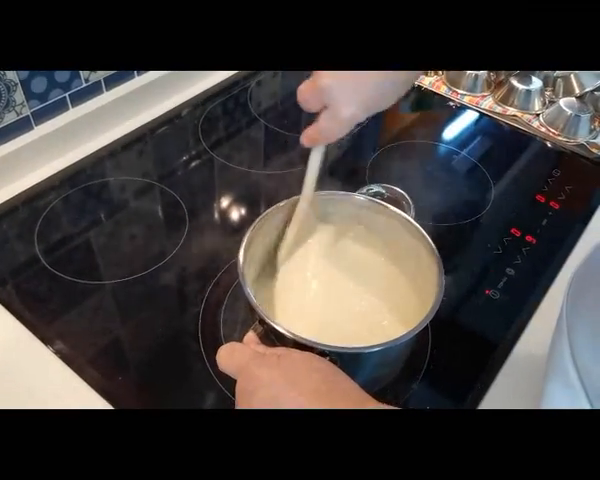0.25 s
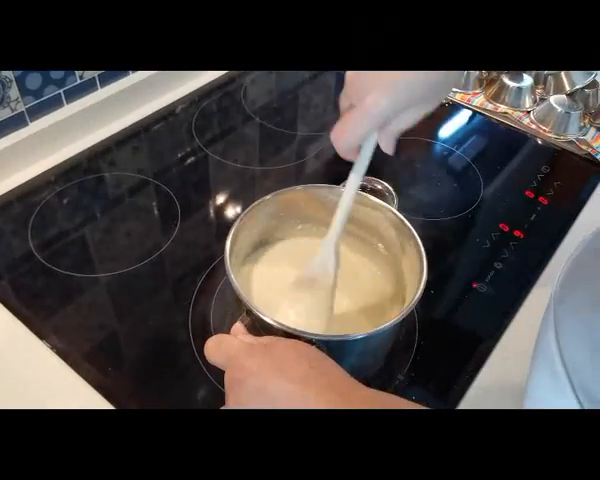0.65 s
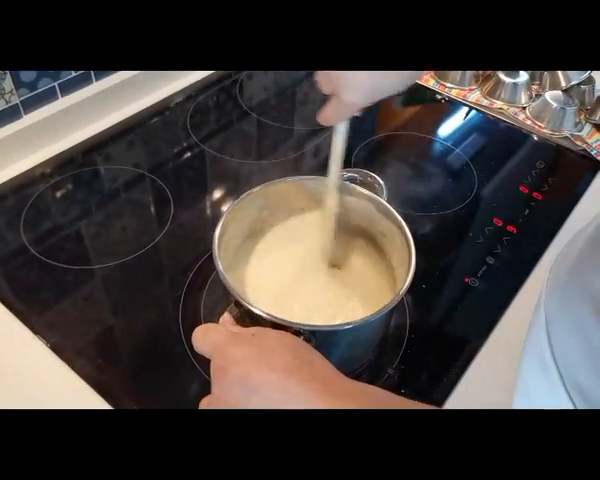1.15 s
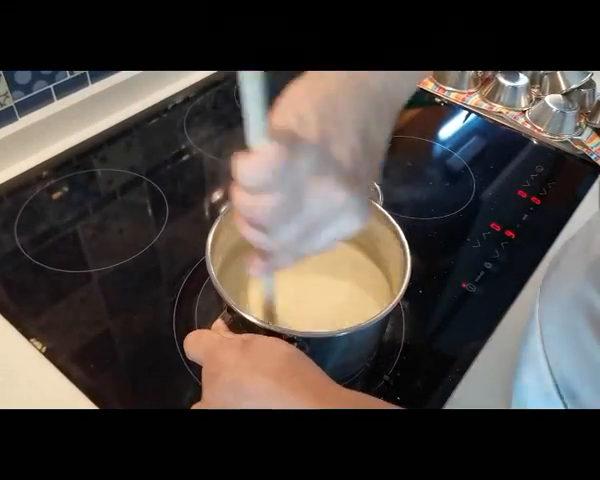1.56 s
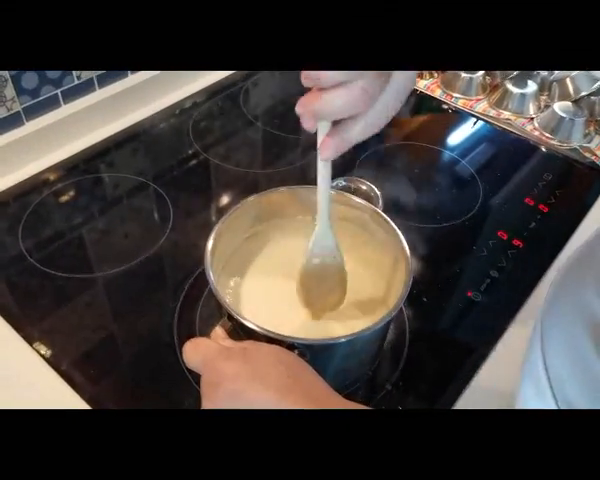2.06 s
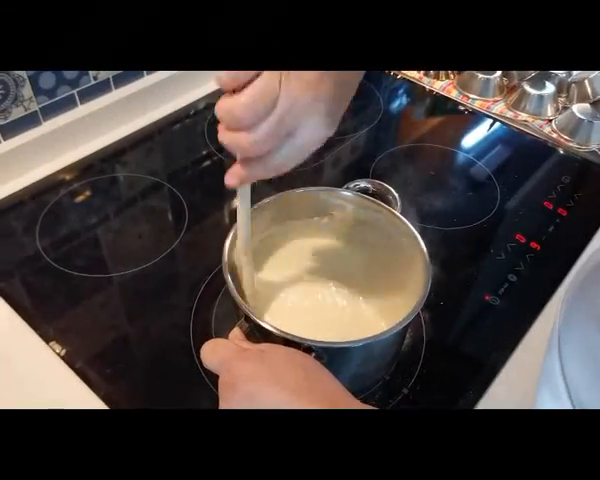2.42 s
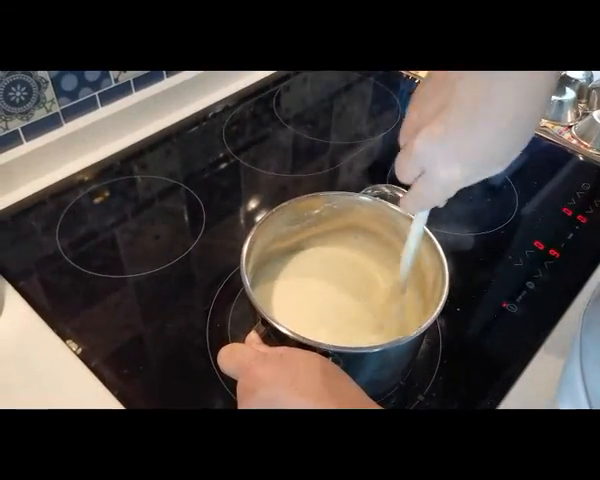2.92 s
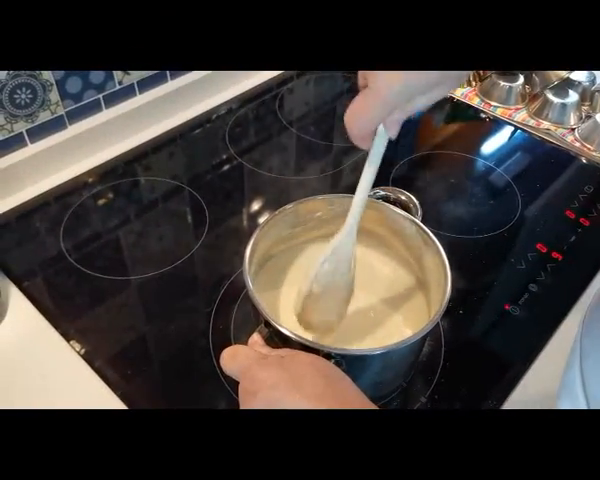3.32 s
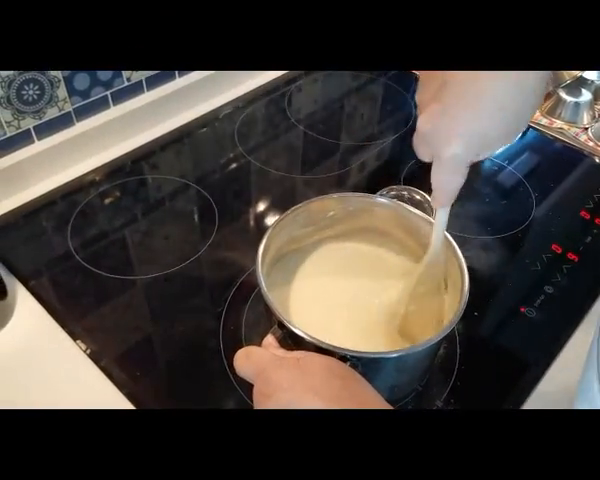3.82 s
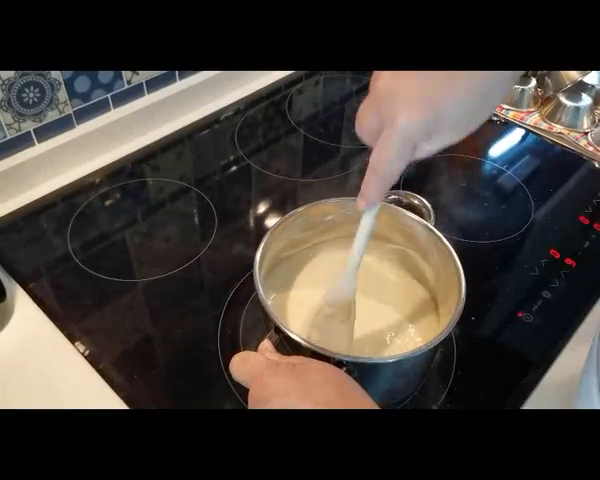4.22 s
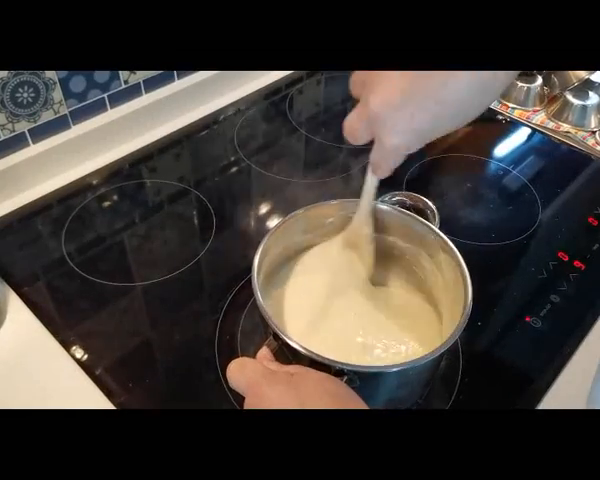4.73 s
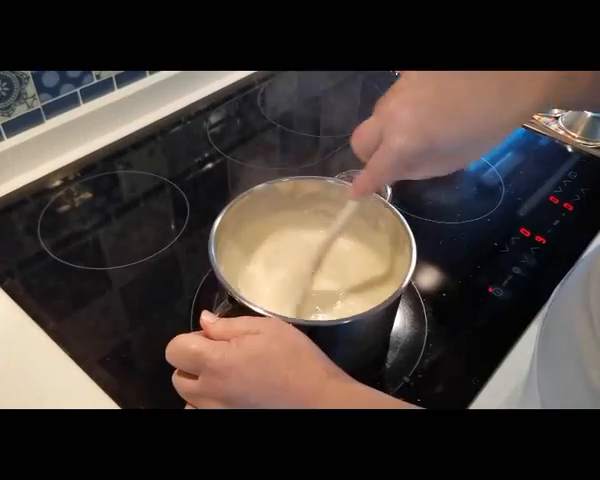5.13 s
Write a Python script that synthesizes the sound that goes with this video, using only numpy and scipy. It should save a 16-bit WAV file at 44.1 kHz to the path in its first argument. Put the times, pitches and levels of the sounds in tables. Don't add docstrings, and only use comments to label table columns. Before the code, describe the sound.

Irregular muffled wood-on-steel knocks break up soft scraping and wet dragging as a heavy filling is stirred in a pan on a glass hob.

```python
import sys
import numpy as np
from scipy import signal
from scipy.fft import rfft, irfft, next_fast_len
from scipy.io import wavfile
from scipy.ndimage import uniform_filter1d, map_coordinates

SR = 44100
rng = np.random.default_rng(int(sys.argv[2]) if len(sys.argv) > 2 else 0)


def voltage_ratio(decibels):
    exponent = np.asarray(decibels, float) / 20
    return 10 ** exponent


def persist_wave(psi):
    counts = np.round(np.clip(psi, -1, 1) * 32767).astype(np.int16)
    wavfile.write(sys.argv[1], SR, np.atleast_2d(counts).T)


N = 237037

# (frequency [Hz], left-right likeness [0-1])
ALIKE = [(60, .88), (300, .82), (700, .5), (1400, .3), (2800, .14), (6000, .04), (12000, .16)]
# (frequency [Hz], width [Hz], level [dB])
BOTTOM = [(915, 110, -2.5), (1450, 190, 0), (1800, 200, -5), (2160, 140, .5), (2600, 200, -3),
          (2900, 350, -4.5)]
# (frequency [Hz], width [Hz], level [dB])
WALL = [(2580, 120, -5), (2890, 91, 4), (3330, 140, -7.5), (3890, 350, 0.5), (4540, 450, 6), (5130, 430, 6),
        (6410, 1600, -1)]


def unit(x):
    return x / np.sqrt(np.mean(x ** 2) + 1e-20)


def along(points, hz):
    f, v = np.transpose(points)
    return np.interp(np.log(hz + 1), np.log(f + 1), v)


def curves(rows):
    s, *columns = np.transpose(rows)
    return [np.interp(np.arange(N) / SR, s, c) for c in columns]


def wobble(rate):
    knots = rng.standard_normal(int(N * rate / SR) + 4)
    return map_coordinates(knots, [np.arange(N) * rate / SR], order=1)


def filtered(x, response):
    m = next_fast_len(N + SR // 2)
    return irfft(rfft(x, m) * response(np.fft.rfftfreq(m, 1 / SR)), m)[..., :N]


def resonances(modes):
    def response(f):
        total = 0
        for k, (centre, width, db) in enumerate(modes):
            damping = 1j * f * width
            total = total + (-1) ** k * voltage_ratio(db) * damping / (centre * centre - f * f + damping)
        return total
    return response


def spread(hz):
    return np.arccos(along(ALIKE, hz))


def pair(response, grit_db=0., rate=300, patchy_db=1.5):
    rough = rng.standard_normal((2, N)) * voltage_ratio(grit_db * wobble(rate))
    z = signal.stft(rough, nperseg=256)[2]
    blotches = uniform_filter1d(rng.standard_normal(z.shape[1:]), size=4, axis=0)
    blotches = unit(uniform_filter1d(blotches, size=10, axis=1))
    noise = signal.istft(z * voltage_ratio(patchy_db * blotches), nperseg=256)[1][:, :N]

    def mid_side(hz):
        turn = spread(hz) / 2
        return response(hz) * [np.cos(turn), np.sin(turn)]

    mid, side = filtered(noise, mid_side)
    return unit(np.array([mid + side, mid - side]))


def add(out, s, sound, pan_db):
    at = round(s * SR)
    out[:, at:at + sound.shape[-1]] += sound * voltage_ratio([[pan_db / 2], [-pan_db / 2]])


def knocks():
    # (time [s], peak [dB], edge [dB], top [dB], left-right [dB])
    blows = [(0.071, -25.5, -10.5, -17, -1.5), (0.332, -25, -7.5, -14, -3), (0.417, -39.5, -1, -57, 2),
             (1.007, -29, -14.5, -16, -2.5), (1.335, -52.5, -11, -43, 1), (2.241, -34.5, -31, -30, 5),
             (2.628, -34, -10.5, -16, 8), (2.925, -52, -19, -1, 7), (3.564, -42, -74, -39, 2.5),
             (3.834, -54.5, 11, -1, 23), (4.311, -23.5, -21, -24, 2.5), (5.012, -46, -4.5, -42, 2),
             (5.119, -37.5, -8.5, -4.5, 5.5), (5.206, -40, -15, -18, 3)]
    # (body [dB], favoured mode [Hz], its boost [dB], favoured body mode [Hz],
    # ring length [factor])
    spots = [(-0.5, 704, 2.5, 310, 0.69), (-0.5, 1400, 11.5, 198, 0.76), (8.5, 716, 10.5, 96, 0.63),
             (-2, 1178, 11, 510, 1.09), (3.5, 784, 21, 320, 1.47), (-0.5, 845, 17.5, 312, 0.69),
             (-3, 676, 9, 450, 0.5), (-6, 1378, 26.5, 234, 1.3), (10, 250, 2, 388, 1.1),
             (-10, 1640, -17, 430, 0.36), (-1, 1082, 13, 312, 0.67), (-20, 1400, 19, 240, 0.52),
             (4, 678, 5.5, 230, 0.72), (2.5, 690, 13.5, 312, 0.39)]
    booms_db = [-6, -12, -12, -8, -3, -14, -14, -14, -9, -21, -4, -20, -11, -15]
    # (frequency [Hz], level [dB], t60 [s])
    pan_modes = [(198, 7.5, 0.17), (236, 12.5, 0.067), (309.3, 2.5, 0.2), (432, 11, 0.063), (541, 2, 0.14),
                 (690, 5, 0.081), (821, 10, 0.027), (920, 3, 0.066), (1067, 5, 0.044), (1175, 9, 0.057),
                 (1283, 0, 0.036), (1425, 9, 0.028), (1600, 10, 0.058), (1750, 4, 0.12),
                 (1992, 11.5, 0.051), (2223, 17, 0.017), (2555, 14, 0.043), (2744, 5, 0.053),
                 (2920, -6.5, 0.15), (3230, 12, 0.037), (3390, 11.5, 0.014), (3940, 3.5, 0.039),
                 (4300, -36, 0.076), (4900, -35, 0.02)]
    thud_base_db, softest_edge_db = -4.5, -8
    body_late_hz = 350

    out, t = np.zeros((2, N + SR)), np.arange(SR // 7) / SR
    hz, level_db, t60 = np.transpose(np.repeat(pan_modes, 2, axis=0))[:, :, None]
    luck = rng.standard_normal((len(blows), 5, len(hz), 1))
    slosh = rng.standard_normal((len(blows), len(hz), 24)).cumsum(axis=2)
    knots = np.clip(1 - abs(t / t[-1] * 23 - np.arange(24)[:, None]), 0, 1)
    band = signal.butter(3, [.011, .13], "band")
    puffs = signal.lfilter(*band, rng.standard_normal((len(blows), 2, len(t))))
    swell_in = 1 - np.exp(-t * hz / 2.2 / (1 + (body_late_hz / hz) ** 2))
    fade_out = 1 - (t / t[-1]) ** 4

    def near(centre_hz):
        return np.exp(-(np.log(hz / centre_hz) / 0.057) ** 2)

    for blow, spot, chance, drift, puff, boom_db in zip(blows, spots, luck, slosh, puffs, booms_db):
        s, db, edge_db, top_db, pan_db = blow
        body_db, main_hz, main_db, low_hz, length = spot
        size, life, lead, tune, start = chance

        boom = uniform_filter1d(puff[:, ::-1], size=16, axis=1) * (1 - np.exp(-t / 0.004)) * fade_out
        add(out, s, voltage_ratio(db + boom_db - 60 * t / 0.23) * boom, pan_db)

        band_db = along([(420, body_db), (800, 0), (1300, 0), (2300, edge_db), (4200, top_db)], hz)
        start_db = level_db + band_db + main_db * near(main_hz) + 7 * near(low_hz) + size
        fall = voltage_ratio(start_db - 60 * t / (t60 * length * np.exp(life / 10))) * swell_in * fade_out
        turn = 2 * np.pi * hz * (1 + 0.04 * tune) * t + 0.83 * start
        turn = turn + 1.7 * drift @ knots
        lag = 0.52 * spread(hz) * np.sign(lead) * [[[1]], [[-1]]]
        add(out, s, voltage_ratio(db - 11.0) * (fall * np.sin(turn + lag)).sum(axis=1), pan_db)

        thud_db = db + thud_base_db + max(edge_db, softest_edge_db)
        thud = puff * (1 - np.exp(-(t / 0.002) ** 2))
        crack = np.gradient(thud, axis=1)
        add(out, s, voltage_ratio(thud_db - 6.5 - 60 * t / 0.068) * thud, pan_db)
        add(out, s, voltage_ratio(thud_db - 3.5 - 60 * t / 0.021) * crack, pan_db)
    return out[:, :N]


def rings():
    # (time [s], level [dB], [(frequency [Hz], level [dB], t60 [s])])
    clear = [
        (0.07, -29.5, [(530, -5, 0.06), (982, -2, 0.094), (1175, -5, 0.11), (1640, -3, 0.044), (3140, -10, 0.036)]),
        (0.332, -33, [(805, -21, 1), (2020, 5.5, 0.042), (3186, -14, 0.21), (4410, -6, 0.057), (4850, -8, 0.087)]),
        (0.416, -41.5, [(670, 0, .04), (1440, 1, 0.03), (2050, 6.5, 0.034)]),
        (1.007, -20.5, [(922, 0.5, 0.047), (1182, -4, 0.06), (1270, -29, 0.67), (2290, -18, 0.04), (3140, -12.5, 0.029)]),
        (2.241, -37, [(289, -7.5, 0.33), (605, -5.5, 0.13), (970, 5.5, 0.05), (2330, -10.5, 0.032)]),
        (2.628, -40.5, [(486, 7, 0.032), (670, 0.5, 0.089), (2210, -7, 0.094), (2745, -23, 0.13)]),
        (3.564, -41.5, [(307, -8.5, 0.99), (401, 5, 0.099), (764, -2, 0.047), (1065, 3, 0.082)]),
        (4.3115, -27.5, [(407, 0, 0.072), (1050, -4, 0.015), (1190, 2, 0.031), (1500, -12, 0.025), (2400, -19, 0.11), (3570, -22, 0.065)]),
        (5.119, -41.5, [(315.3, -5.5, 0.53), (610, 6, 0.052), (1390, -6, 0.1), (1783, -3, 0.075)]),
    ]
    # (frequency [Hz], phase [rad])
    port_lead = [(300, -0.58), (1000, 1.15), (2000, -0.9), (4000, 1.84)]
    blur = 0.11
    out, t = np.zeros((2, N + SR)), np.arange(SR // 3) / SR
    for s, db, modes in clear:
        hz, level_db, t60 = np.transpose(modes)[:, :, None]
        walk = rng.standard_normal((len(hz), len(t))).cumsum(axis=1) * np.sqrt(hz / SR)
        walk = uniform_filter1d(walk, size=90, axis=1)
        fall = voltage_ratio(db + level_db - 60 * t / t60) * (1 - np.exp(-t / 0.0011)) * (1 - (t / t[-1]) ** 2)
        turn = 2 * np.pi * (hz * t + blur * walk) + along(port_lead, hz) * [[[.5]], [[-.5]]]
        add(out, s, (fall * np.sin(turn)).sum(axis=1), 0)
    return out[:, :N]


def catches():
    # (time [s], jump of the hiss [dB], jump of the bottom scrape [dB])
    slips = [(0.379, 2.5, -7), (0.424, 6.5, 8), (0.455, 1, -7), (0.478, -3.5, -1), (0.5, -1.5, -3.5),
             (0.53, -0.5, -2), (0.548, -3.5, -3), (1.879, 6.5, 2), (1.93, -2.5, 2), (2.744, 4.5, -4),
             (2.78, 3.5, 4), (2.808, 2.5, -1.5), (2.839, -2, 6.5), (2.859, -4.5, -1), (2.89, -2, 7.5),
             (2.915, -2.5, 1), (3.0, 8.5, 1.5), (3.082, 3, 8), (3.886, 4, 13.5), (3.991, 5.5, 0),
             (4.643, 15, 8.5), (4.667, -0.5, 0), (4.7, 1, -6), (4.717, 8, 5.5), (4.748, 5, 0.5),
             (4.764, 7.5, 11), (4.794, 5, 0), (4.815, -3, 0), (4.85, 1, 3.5), (4.88, 8, 3.5),
             (4.955, 1.5, 6.5), (4.98, -1, -1.5), (5.005, 5, 6)]
    slip_db, rub_db = np.zeros((2, N + SR))
    since = np.arange(SR // 5) / SR
    jump = (1 - np.exp(-since / 0.0048)) * np.exp(-since / 0.031)
    for s, hiss_jump_db, rub_jump_db in slips:
        at = round(s * SR)
        slip_db[at:at + len(jump)] += hiss_jump_db * jump
        rub_db[at:at + len(jump)] += rub_jump_db * jump
    return slip_db[:N], rub_db[:N]


def stroke():
    # (time [s], hold [s], bottom scrape [dB], wall scrape [dB], hiss [dB])
    slides = [(0.073, 0.014, -60, -55.5, -61), (0.333, 0.088, -49.5, -68, -50.5),
              (0.45, 0.11, -50, -65, -50.5), (1.01, 0.0026, -34.5, -68, -79), (1.08, 0.2, -63, -84, -90),
              (1.257, 0.02, -61, -64, -55), (1.853, 0.085, -57.5, -75, -59),
              (1.936, 0.079, -61.5, -74, -70.5), (2.418, 0.24, -68, -67.5, -71),
              (2.628, 0.044, -55.5, -55.5, -58), (2.698, 0.069, -58.5, -68, -68.5),
              (2.749, 0.17, -56, -61.5, -55), (2.963, 0.099, -66.5, -94, -76),
              (3.15, 0.013, -69.5, -69, -72), (3.547, .01, -98, -81, -71), (3.797, 0.064, -64, -67, -71),
              (3.836, 0.16, -64, -74, -62.5), (4.307, 0.15, -68.5, -98, -87), (4.516, 0.071, -69, -68, -64),
              (4.627, 0.053, -57.5, -52, -65), (4.671, 0.22, -53.5, -60, -57.5),
              (4.946, 0.074, -52.5, -56, -56.5), (5.116, 0.073, -65, -90, -101),
              (5.349, 0.007, -70, -73, -65)]
    # (rise [s], fall [s], left-right [dB], tilt onto its edge [0-1], custard drag [dB])
    grip = [(0.021, 0.097, -1, 0.15, -68), (0.11, 0.033, -4.5, 0.06, -54), (0.035, 0.029, -1.5, 0.09, -63),
            (0.0054, 0.0057, -8, 0.7, -43), (.1, 0.079, -4.5, .6, -82), (0.05, 0.019, 2, 0, -64),
            (0.11, 0.021, 1, 0.09, -60), (0.082, 0.041, -1.5, 0.2, -54), (0.15, 0.041, -2, 0.47, -68.5),
            (0.018, 0.045, 0, 0.2, -51), (0.045, 0.022, 0.5, 0.5, -64), (0.03, 0.042, 5, 0.46, -66.5),
            (0.044, 0.066, 11, 0.55, -67.5), (0.078, 0.067, 2, 0.4, -83), (0.11, 0.066, 0, 0.3, -88),
            (0.22, 0.025, -4, 0.4, -63.5), (0.0091, 0.11, 3, 0.15, -63), (0.027, 0.053, 2, .5, -59.5),
            (0.054, 0.058, -0.5, 0.5, -86.5), (0.049, .04, 3.5, 0.4, -60), (0.018, 0.019, 2.5, 0.02, -76),
            (.02, 0.0051, -4, 0.13, -78), (0.065, 0.24, -1, .4, -59), (0.0095, 0.045, 5, 0.8, -75)]
    # (time [s], custard drag [dB], light trailing contact [dB])
    stirring = [(0, -67, -77.5), (.23, -69, -73.5), (.58, -67.5, -64), (.65, -62, -67), (.9, -66.5, -68),
                (1.02, -62, -77), (1.31, -63.5, -71), (1.34, -57.5, -73), (1.52, -72.5, -76),
                (1.55, -74.5, -70), (1.72, -59, -71.5), (1.8, -60, -80), (1.95, -61.5, -85),
                (2.08, -58, -83), (2.3, -80, -81.5), (2.93, -79, -74), (3.3, -69, -81.5), (3.6, -61.5, -79),
                (4.3, -70, -79), (5.37, -58.5, -77)]
    # (time [s], place [0 middle to 1 rim])
    place = [(0, 0.46), (.57, 0.086), (.7, 0.79), (1.2, 0.1), (1.8, 0.38), (2.6, 0.96), (2.75, 0.44),
             (2.92, 0.23), (3.0, 0.17), (3.9, 0.62), (4.35, 0.21), (4.66, 0.71), (4.74, 0.091),
             (5.02, 0.064), (5.37, 0.37)]
    # (frequency [Hz], width [Hz], level [dB])
    drag_modes = [(272.4, 99, 1), (329.6, 130, 0), (461, 119, -1.5), (566, 266, -6), (763, 334, -8.5)]
    # (frequency [Hz], density [dB per Hz])
    flat_hiss = [(2820, -13), (3400, -11.5), (4200, -8), (4800, -6.5), (5760, -10), (6590, -6.5),
                 (8150, -15), (11600, -12), (13200, -18.5), (15700, -32.5)]
    # (frequency [Hz], density [dB per Hz])
    edge_squeak = [(3240, -38), (5500, -7.5), (7510, 2.5), (9220, 1.5), (9850, 1), (10400, -55.5),
                   (12000, -27), (15700, -22)]
    ramp_db = 20
    rim_stiffer = 1.155
    trail_bottom_db, trail_wall_db, trail_pan_db, trail_tilt = 1.5, -3.5, -2, 0.084

    t = np.arange(N) / SR
    stir_db, trail_db = curves(stirring)
    start, hold, bottom_db, wall_db, hiss_db = np.transpose(slides)
    rise, fall, pan_db, tilt, drag_db = np.transpose(grip)
    before = (start[:, None] - t) / rise[:, None]
    after = (t - (start + hold)[:, None]) / fall[:, None]
    away = np.clip(np.maximum(before, after), 0, 8)
    press = np.vstack([voltage_ratio(-2 * ramp_db * away), voltage_ratio(2 * trail_db)])
    ports = voltage_ratio(np.outer([1, -1], np.append(pan_db, trail_pan_db)))
    edge = np.append(tilt, trail_tilt)

    def gain(db, trailing_db, share=1):
        return np.sqrt(share * ports * voltage_ratio(2 * np.append(db, trailing_db)) @ press)

    def twice(modes):
        return lambda hz: resonances(modes)(hz) ** 2

    slip_db, rub_db = catches()
    judder_db, heave_db = 1.6 * wobble(35), 1.8 * wobble(20)

    wade = np.sqrt(voltage_ratio(2 * stir_db) + voltage_ratio(2 * drag_db) @ press[:-1])
    drag = wade * voltage_ratio(heave_db) * pair(resonances(drag_modes), grit_db=2.0, rate=48, patchy_db=0.5)

    rim = curves(place)[0]
    bottom_grit = dict(grit_db=3.5, rate=110, patchy_db=2.)
    middle = pair(twice(BOTTOM), **bottom_grit)
    outer = pair(lambda hz: twice(BOTTOM)(hz / rim_stiffer), **bottom_grit)
    bottom = voltage_ratio(judder_db + rub_db) * (np.sqrt(1 - rim) * middle + np.sqrt(rim) * outer)

    wall = voltage_ratio(judder_db + 0.055 * slip_db) * pair(twice(WALL), grit_db=2.5, rate=150, patchy_db=2.5)

    hiss_grit = dict(grit_db=2.3, rate=220, patchy_db=2.)
    flat = pair(lambda hz: voltage_ratio(along(flat_hiss, hz)), **hiss_grit)
    tilted = pair(lambda hz: voltage_ratio(along(edge_squeak, hz)), **hiss_grit)
    hiss = gain(hiss_db, 0, 1 - edge) * flat + gain(hiss_db, 0, edge) * tilted
    hiss = voltage_ratio(judder_db + 1.45 * slip_db) * hiss

    scrape = gain(bottom_db, trail_bottom_db) * bottom + gain(wall_db, trail_wall_db) * wall
    return drag + scrape + hiss


def ticks():
    # (time [s], peak [dB], wall over bottom [dB], left-right [dB])
    trips = [(0.9925, -54, 6, 0), (1.896, -55, 3, 0), (1.915, -44, 9, -5), (2.455, -51.5, 16, -5),
             (2.461, -57, 15, -5), (5.019, -40, -6, 8), (0.5517, -46, 2, 0), (4.306, -62, 7, -3),
             (4.6308, -50, 6, -4), (4.641, -47, 8, 10), (4.667, -32, -6, 4), (4.7192, -39, 0, 3),
             (4.75, -42, 4, 3), (4.764, -34, -1.5, -9), (4.771, -47, -2, 1), (4.7944, -45, -7, -3),
             (4.798, -43, 0, 0), (4.81, -39, 0, 8), (4.823, -46, -3, 5), (4.846, -41.5, -12, 3),
             (4.864, -48.5, -3, 3), (4.9595, -36.5, -2, -2.5), (5.0124, -38, -15, 5)]
    low, high = np.zeros((2, 2, N + SR))
    t = np.arange(SR // 40) / SR
    burst = voltage_ratio(-60 * t / 0.025) * (1 - np.exp(-t / .0007))
    for s, db, wall_db, pan_db in trips:
        slip = rng.standard_normal((2, len(t))) * burst
        add(low, s, voltage_ratio(db + 8.5) * slip, pan_db)
        add(high, s, voltage_ratio(db + wall_db - 6.5) * slip, pan_db)
    return filtered(low[:, :N], resonances(BOTTOM)) + filtered(high[:, :N], resonances(WALL))


def thumps():
    # (time [s], peak [dB], upper mode [dB], t60 [s])
    rocks = [(0.074, -61.5, 15.5, 0.24), (0.335, -37, 9, 0.17), (0.418, -45.5, 5, 0.3),
             (1.009, -56, 7.5, 0.36), (1.346, -43.5, -4, 0.19), (1.38, -48, -30, 0.27),
             (1.494, -44, -9.5, 0.31), (1.946, -52, -9, 0.23), (2.246, -61, 0.5, 0.33),
             (2.63, -40.5, -6.5, 0.35), (2.8, -70, 14.5, 0.45), (3.576, -60, 16.5, 0.15),
             (4.312, -44.5, 1.5, 0.31), (4.581, -48.5, -43, 0.18), (4.808, -59.5, 0.5, 0.81),
             (4.958, -57, 3, 0.48), (5.121, -39, -2, 0.14), (5.204, -37, -0.5, 0.24),
             (5.277, -52, 12.5, 0.13)]
    plate_hz = [66.5, 116.6]
    out, t = np.zeros((2, N + SR)), np.arange(SR // 2) / SR
    turns = 2 * np.pi * np.array(plate_hz)[:, None, None] * t
    low, upper = np.sin(turns + [[.15], [-.15]])
    for s, db, upper_db, t60 in rocks:
        fall = voltage_ratio(db + 2.0 - 60 * t / t60) * (1 - np.exp(-t / 0.0021))
        add(out, s, fall * (low + voltage_ratio(upper_db) * upper), 1.8)
    return out[:, :N]


def snaps():
    bursts = [(1.008, -45, 7300, -1, -20), (2.2415, -50, 4900, -10, -13), (4.313, -52.5, 8550, 6, -15),
              (1.04, -48, 3390, 13, -21), (1.536, -66, 3800, -1, 17), (2.0034, -59, 2520, -4, 1),
              (2.016, -43, 4300, -8, -5), (2.055, -66, 11000, 0, -10), (2.0374, -66, 2560, 0, -14),
              (2.0909, -48.5, 2370, -14, -5), (2.1665, -64, 2130, 0, 6), (2.177, -42, 2950, -12.5, 3.5),
              (2.212, -51.5, 2220, -11, 2), (2.398, -54, 4200, -17, -23), (2.4543, -37.5, 3470, -9, -16),
              (3.8342, -29, 2980, -14, -19), (4.509, -56.5, 2170, 14, 5)]
    out, t = np.zeros((2, N + SR)), np.arange(-SR // 200, SR // 50) / SR
    swell = np.where(t < 0, -t / .0012, t / .003)
    spray_shape = voltage_ratio(-70 * swell) + voltage_ratio(-22 - 12 * swell) * (t > 0)
    body = np.sin(2 * np.pi * 1400 * t) * voltage_ratio(-90 * swell)
    for s, db, hz, pan_db, spray_db in bursts:
        click = np.sin(2 * np.pi * hz * t) * voltage_ratio(-120 * swell)
        spray = voltage_ratio(spray_db - 1) * rng.standard_normal((2, len(t))) * spray_shape
        add(out, s + t[0], voltage_ratio(db + 2.5) * (click + spray + voltage_ratio(spray_db - 7) * body), pan_db)
    return filtered(out[:, :N], lambda hz: 1 / (1 + (hz / 12000) ** 10))


def room(hits):
    # (frequency [Hz], t60 [s])
    decay = [(150, 0.65), (600, 0.38), (2000, 0.26), (5000, 0.28), (12000, 0.18)]
    out, step = np.zeros((2, N + SR)), SR // 4
    for at in range(0, N, step):
        hz, t, z = signal.stft(rng.standard_normal((2, SR // 2)), SR, nperseg=256)
        alike = along(ALIKE, hz)[:, None]
        z[1] = alike * z[0] + np.sqrt(1 - alike ** 2) * z[1]
        tail = signal.istft(z * voltage_ratio(-60 * t / along(decay, hz)[:, None]), SR, nperseg=256)[1]
        wet = signal.fftconvolve(hits[:, at:at + step], tail / np.linalg.norm(tail[0]), axes=1)
        add(out, at / SR + 0.0041, wet, 0)
    return out[:, :N]


def kitchen():
    # (frequency [Hz], density [dB per Hz])
    hum_and_air = [(15, 4), (25, 7), (49, -2), (216, -11.5), (391, -29), (472, -22), (688, -18.5),
                   (1030, -19), (1120, -20), (2310, -23.5), (3860, -25.5), (5780, -38.5), (9910, -50),
                   (11000, -45), (15700, -47.5)]
    return voltage_ratio(-61 + 0.11 * wobble(0.99)) * pair(lambda hz: voltage_ratio(along(hum_and_air, hz)))


def scene():
    wood = signal.butter(4, 5200, fs=SR, output="sos")
    blows = signal.sosfilt(wood, knocks() + rings())
    pops = snaps()
    echo = voltage_ratio(-10.5) * room(blows + voltage_ratio(-8.5) * pops)
    return blows + stroke() + ticks() + thumps() + pops + echo + kitchen()


def low_pass(x):
    return signal.sosfilt(signal.butter(12, 15820, fs=SR, output="sos"), x)


def record(dry):
    # (frequency [Hz], left-right [dB])
    lean = [(100, 2), (250, -3), (600, 0), (1100, 0.5), (2200, 2), (4500, -1.5), (9000, 5), (14000, -1)]
    # (time [s], level [dB])
    dropout = [
        (4.8955, 0),
        (4.897, -23),
        (4.907, -26),
        (4.91, -50),
        (4.917, -60),
        (4.9195, -90),
        (4.946, -90),
        (4.95, -32),
        (4.9545, -26),
        (4.9562, 0),
    ]
    top_hz = 15780
    heard = signal.sosfilt(signal.butter(4, 46, "high", fs=SR, output="sos"), dry)
    heard = filtered(heard, lambda hz: voltage_ratio(along(lean, hz) * [[.5], [-.5]]) * (hz < top_hz))
    low = signal.sosfilt(signal.butter(4, 4500, fs=SR, output="sos"), heard)
    loss = voltage_ratio(curves(dropout)[0])
    heard = loss * low + loss ** 3 * (heard - low)
    offset = -.0004 * np.interp(np.arange(N) / SR, [4.919, 4.9195, 4.935, 4.956], [1, 0, 0, 1])
    return low_pass(heard + offset)


dry = scene()
out = record(dry)
persist_wave(out)
```